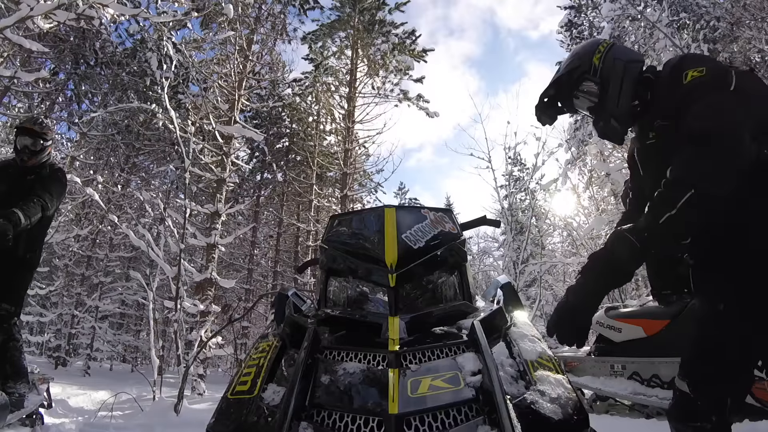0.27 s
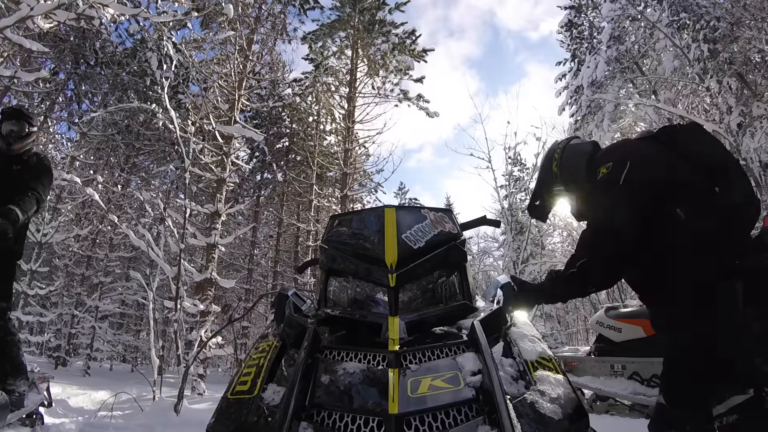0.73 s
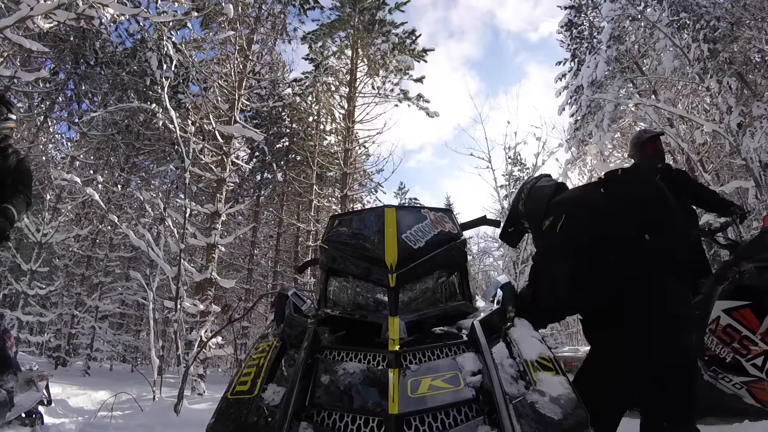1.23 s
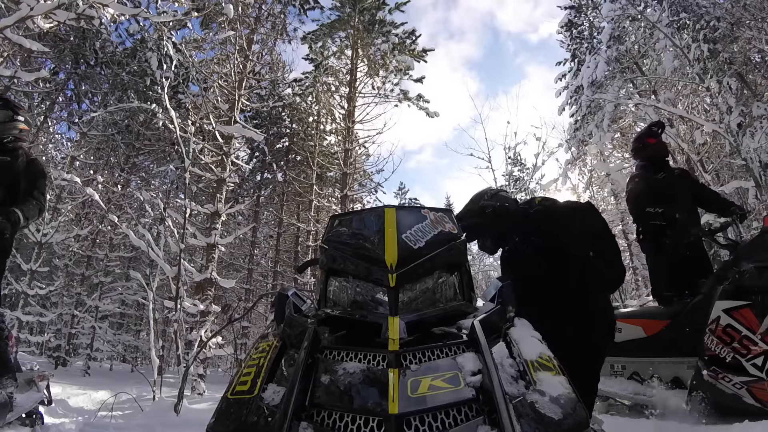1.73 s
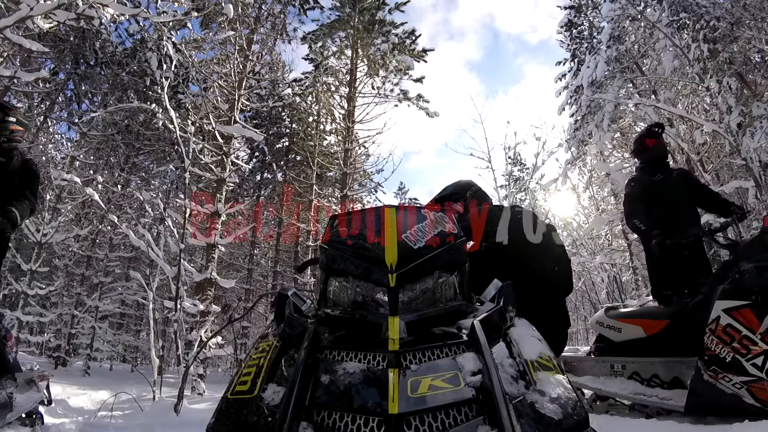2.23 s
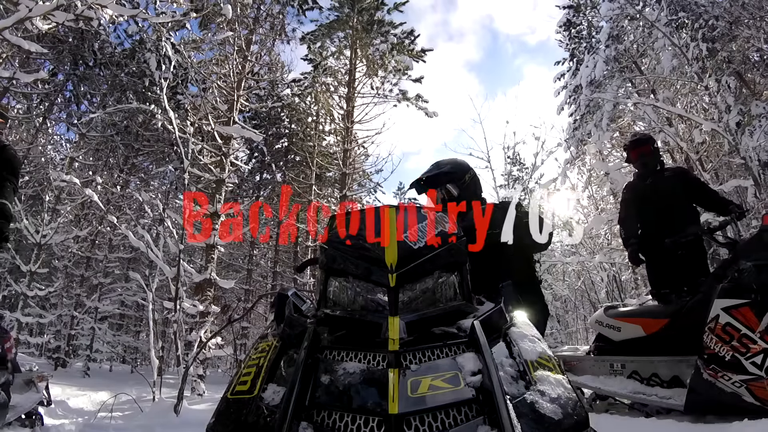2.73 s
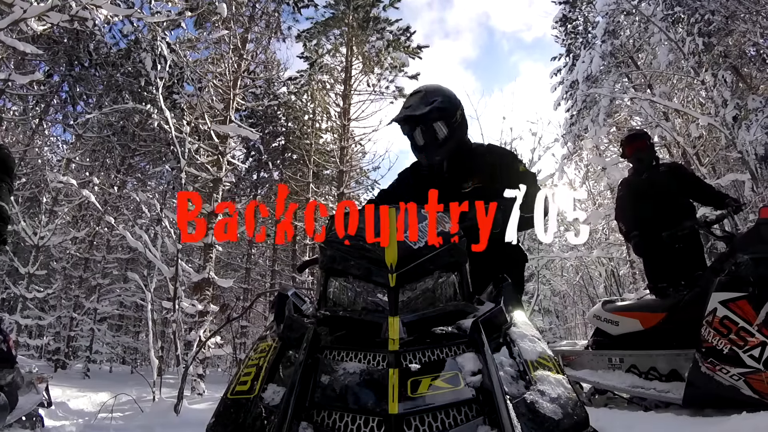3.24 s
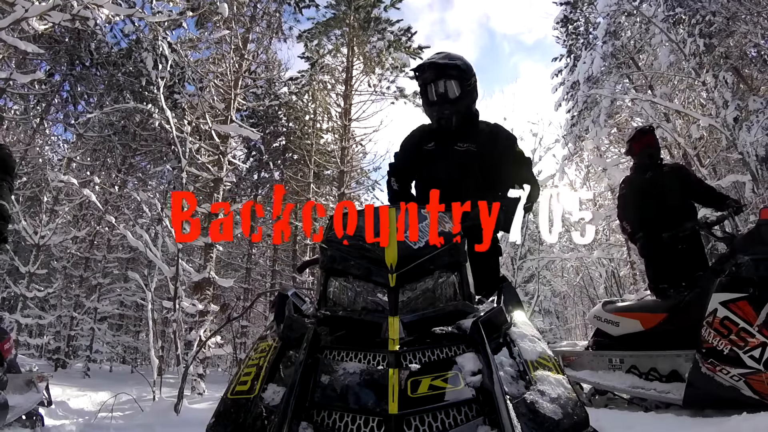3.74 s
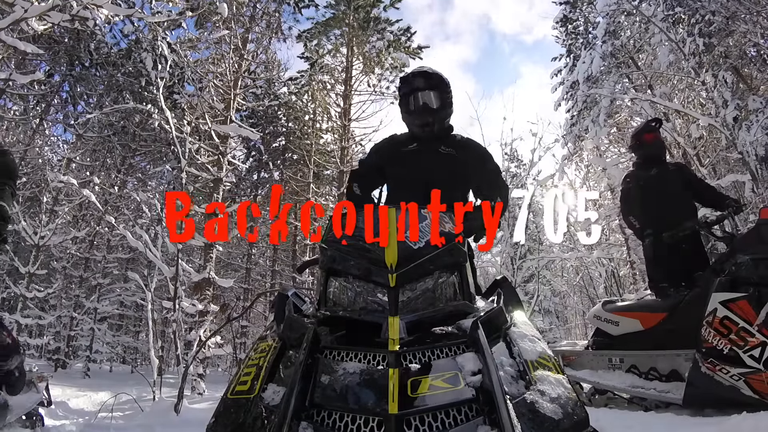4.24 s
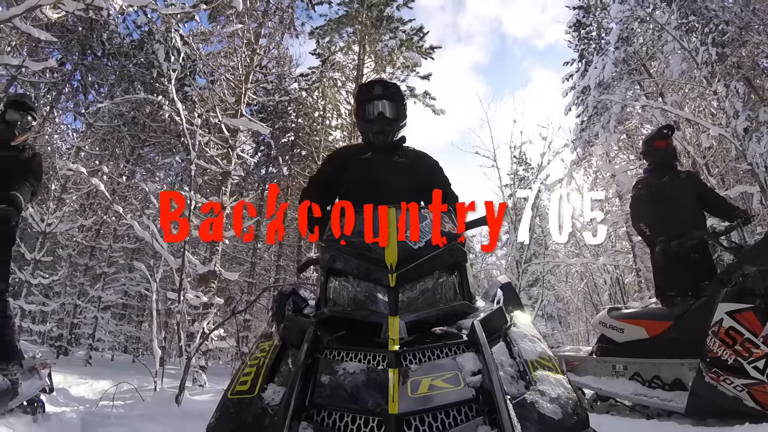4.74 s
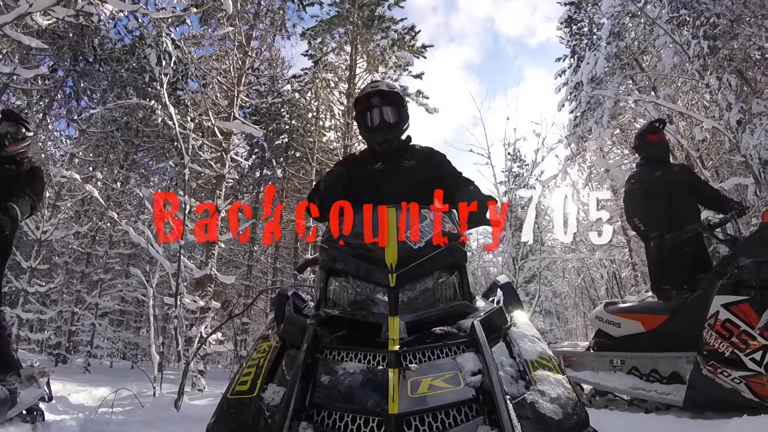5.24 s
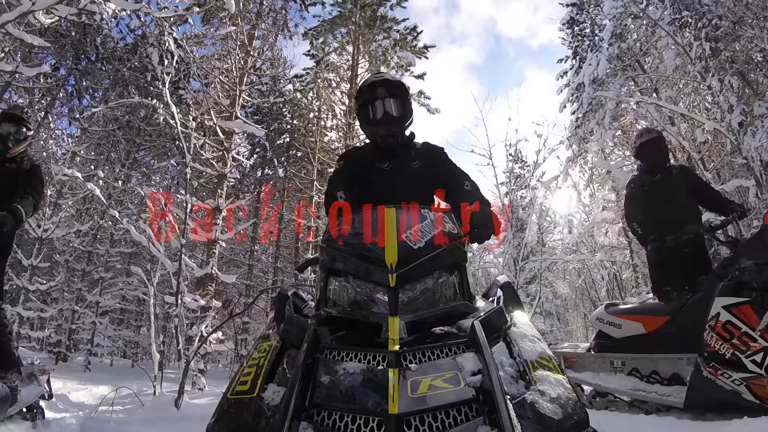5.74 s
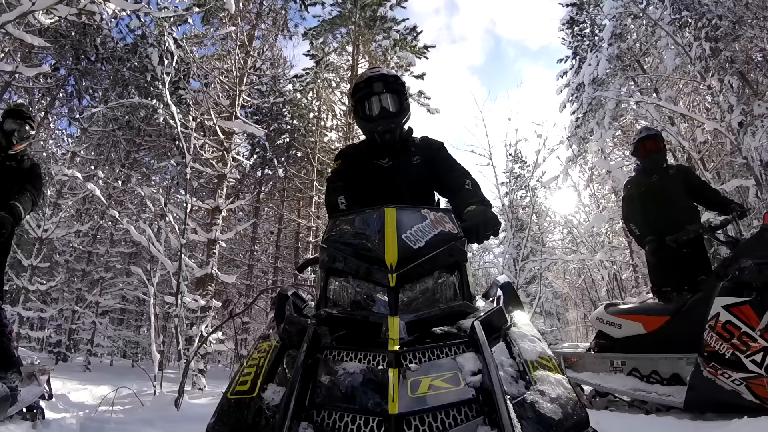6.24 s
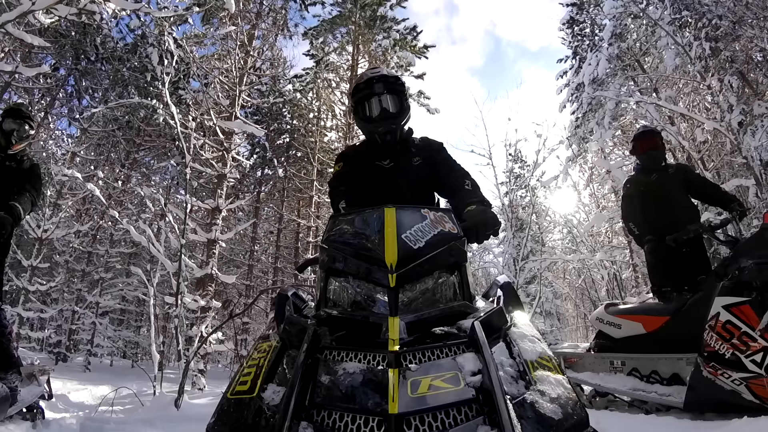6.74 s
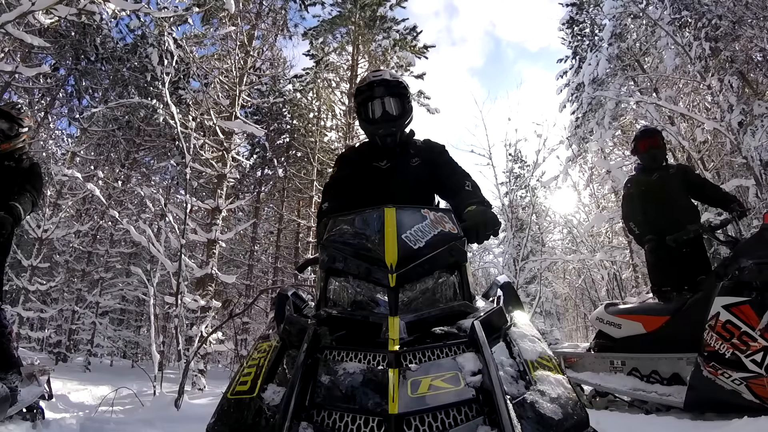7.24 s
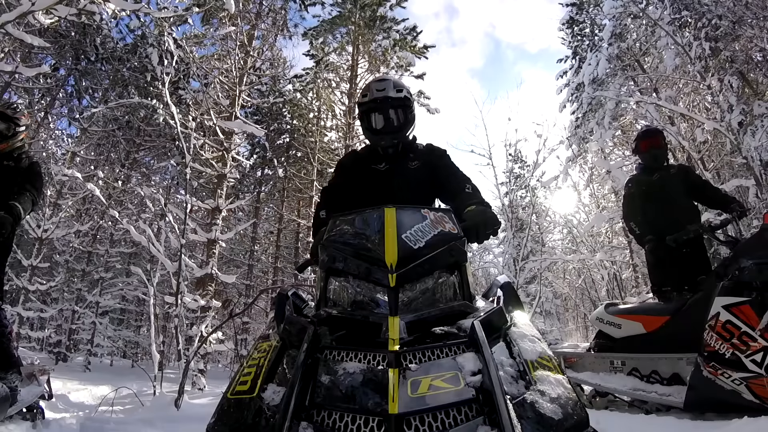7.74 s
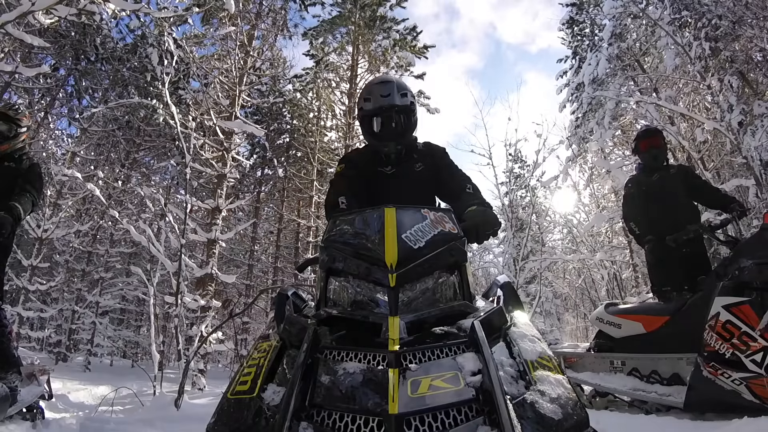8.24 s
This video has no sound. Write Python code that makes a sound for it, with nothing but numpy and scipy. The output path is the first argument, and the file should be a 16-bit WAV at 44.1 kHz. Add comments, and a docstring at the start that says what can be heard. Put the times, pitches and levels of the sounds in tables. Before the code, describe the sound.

Close, dry outdoor sound of several two-stroke snowmobiles idling in snowy woods. The nearest putts in stumbling, changing rhythms over a low hum, with clatter and bright clutch jingle. A distant engine buzzes and runs down early. Late on, a sharp clack, then another sled catches, revs up briefly and sinks to idle.

```python
"""Snowmobiles idle up close and dry, without echo: the nearest putts in changing rhythms over a 119 Hz hum,
its clutch jingling. Another starts after a sharp clack, flares up and sinks to idle; a distant one runs down.
Impulses timed by stroke counts excite muffler filters; shaped noise makes clatter, gas rush, jingle and wind.
Harmonic stacks sing the revving notes; impulses into decaying modes make the clacks and thuds."""
import sys
import numpy as np
from scipy import signal
from scipy.fft import rfft, irfft
from scipy.io import wavfile
from scipy.ndimage import uniform_filter1d, map_coordinates

SR = 44100
rng = np.random.default_rng(int(sys.argv[2]) if len(sys.argv) > 2 else 0)


def wrap_up_sound(samples):
    """Save the sound to the file named by the first command line argument, as 16-bit audio."""
    columns = np.atleast_2d(samples).T
    # keep every value between -1 and 1, then stretch to whole-number steps
    tamed = np.clip(columns, -1, 1)
    steps = np.round(tamed * 32767).astype(np.int16)
    wavfile.write(sys.argv[1], SR, steps)


N = 374409
TIME = np.arange(N) / SR  # seconds

# Rhythms of the near engine. Each entry: name, strokes from one putt to the next, repeated.
GAITS = {"lope": (3, 5), "trot": (3,), "double": (1, 7), "stutter": (1, 2, 1, 4), "lone": (8,)}
# Spells of the near engine, stumbling from rhythm to rhythm. Each row: start in seconds, rhythm name.
SPELLS = [(.003, "lone"), (0.102, "lone"), (.185, "trot"), (0.239, "lone"), (0.339, "lone"),
          (.426, "double"), (0.529, "double"), (0.629, "lone"), (.729, "lope"), (.948, "trot"),
          (1.131, "lope"), (1.479, "lope"), (1.614, "trot"), (1.803, "double"), (1.903, "trot"),
          (2.189, "lope"), (2.405, "lope"), (2.759, "lope"), (3.244, "double"), (3.362, "double"),
          (3.836, "trot"), (4.070, "lope"), (4.338, "trot"), (4.569, "trot"), (4.755, "double"),
          (4.86, "trot"), (5.247, "double"), (5.363, "double"), (5.580, "lope"), (5.717, "trot"),
          (5.921, "double"), (6.026, "double"), (6.127, "lone"), (6.178, "lone"), (6.211, "stutter"),
          (6.512, "lone"), (6.551, "lone"), (6.651, "lone"), (6.752, "lone"), (6.849, "lone"),
          (7.378, "lone"), (7.463, "lope"), (7.72, "lone"), (7.770, "lone"), (7.904, "lone"),
          (8.006, "double"), (8.109, "stutter"), (8.159, "lone"), (8.244, "double"), (8.444, "lone")]
# Strength of the near engine, for putts and hum alike. Each row: time in seconds, relative level in dB.
STRENGTH = [(0, -8.5), (.235, -6), (.285, 7), (.33, -7.5), (.55, -7.5), (1.08, -3.5), (1.13, -2.5), (3, 0),
            (5.8, -0.5), (6.25, -2.5), (6.66, -5.5), (6.75, -0.5), (7, -0.5), (7.12, -4), (7.25, -3),
            (7.4, -1.5), (7.7, -10), (7.78, -1.5), (8.1, -2.5), (8.25, -0.5), (8.49, -3)]
# Tone of one putt through the muffler. Each row: frequency in Hz, relative level in dB.
MUFFLER = [(20, -33), (40, -7.5), (60, -9.5), (100, 3), (125, -1.5), (170, -12.5), (250, -16), (305, -13.5),
           (350, -21.5), (420, -43), (800, -66.5), (2500, -117.5), (8000, -110)]
# Hum of the unfired strokes. Each row: multiple of the stroke rate, relative level in dB.
HUM = [(1, -10.5), (2, 0.5), (3, -24), (4, -17), (5, -18.5)]
# Idling machinery, before make-up gain. Each row: time in seconds, clatter level in dB, jingle level in dB.
IDLE = [(0, -56, -73), (.175, -53, -64.5), (.2, -46.5, -48.5), (1.2, -45, -49.5), (1.45, -48.5, -52.5),
        (3.2, -46, -50), (6.4, -46.5, -51.5), (7.6, -43.5, -48), (8.49, -45.5, -49.5)]
# Mid-range rasp, at the opening and after the flare. Each row: time in seconds, level in dB.
RASP_LEVEL = [(.16, -72), (.22, -53), (.45, -51), (1.25, -62), (1.45, -76), (7.3, -72), (7.5, -46.5),
              (7.8, -46.5), (8.2, -61)]
# Colour of that rasp. Each row: frequency in Hz, relative level in dB.
RASP = [(300, -24.5), (900, -8), (1150, 2), (1430, -1.5), (1750, 0), (2080, -8), (2450, -4.5), (2900, -19),
        (6000, -49)]
# Engine clatter through the hood. Each row: frequency in Hz, relative level in dB.
CLATTER = [(150, 9), (330, 3.5), (450, 2), (700, -3), (1200, -4), (1650, -11), (2000, -11), (2500, -14),
           (3200, -16), (4200, -28.5), (7000, -41), (11000, -52)]
# Jingling steel of the clutch. Each row: frequency in Hz, relative level in dB.
CLUTCH = [(2500, -12.5), (4400, -16), (4900, -9.5), (5350, 0.5), (5700, 2), (6100, -5), (6500, -1.5),
          (6950, -11), (7800, -15.5), (9000, -16.5), (10150, -22.5), (10700, -43.5)]
# Ringing partials of the clutch. Each row: frequency in Hz, relative level in dB.
STEEL = [(4643, -20.5), (5701, -5.5), (6405, 2.5), (6589, -2.5), (6950, -4.5), (7230, -5.5), (7624, -8),
         (7768, -6), (8580, -7.5), (9100, -10.5)]
# Exhausts of the other idling sleds. Each row: frequency in Hz, relative level in dB.
OTHERS = [(12, -24), (25, -10), (50, -4.5), (80, 15.5), (105, -6), (150, 1), (220, -5), (300, -14),
          (420, -14.5), (900, -40), (5000, -89.5)]
# Hum of a second idling sled. Each row: time in seconds, level in dB.
SECOND_HUM = [(0, -41), (.4, -33), (.65, -25), (1.05, -48), (2.2, -34.5), (2.6, -25), (4.2, -38.5),
              (6.3, -27), (7.7, -47), (7.9, -32), (8.49, -29)]
# Deep wind buffet. Each row: frequency in Hz, relative level in dB.
WIND = [(10, -19.5), (22, -15.5), (30, 0.5), (42, 5.5), (70, -25.5), (300, -77.5)]
# Run-downs of the distant sled. Each row: start in seconds, length in seconds, first firing rate in Hz,
# last firing rate in Hz, level at its loudest in dB.
RUN_DOWNS = [(0.15, 0.199, 77.5, 75.6, -36.5), (0.719, 0.71, 75.04, 52.2, -41.5),
             (7.798, .72, 100.9, 69.96, -38.5)]
# Mellow exhaust of the distant sled. Each row: frequency in Hz, relative level in dB.
DISTANT_PIPE = [(100, -17), (250, 0.5), (330, 0.5), (450, 1), (540, -7), (610, -2), (720, -10), (1000, -15),
                (2200, -18)]
# Dull thuds of the chassis. Each row: time in seconds, blow strength in dB.
THUDS = [(.161, -40.5), (.24, -43), (8.459, -27.5)]
# Modes that ring after a thud. Each row: frequency in Hz, decay in seconds, relative level in dB.
THUD_RING = [(392, 0.013, -9.5), (527, 0.01, 2.5), (575, 0.01, -8), (1360, .005, -12), (2090, 0.005, -16)]
# Sharpest clinks of the clutch. Each row: time in seconds, blow strength in dB.
CLINKS = [(.775, -21.5), (1.569, -26.5), (2.005, -30), (2.056, -25), (2.235, -24.5), (2.526, -28),
          (2.617, -24), (2.758, -32), (2.838, -23.5), (2.861, -27), (3.031, -30), (3.363, -25),
          (3.488, -22.5), (4.012, -22), (4.491, -26), (4.642, -23), (4.867, -23), (4.952, -22),
          (5.038, -22), (5.087, -23), (5.264, -30), (5.357, -27), (5.409, -21), (5.777, -22.5),
          (6.132, -23), (6.285, -20), (6.605, -16.5), (6.675, -13), (6.696, -14), (6.742, -14.5),
          (6.767, -15)]
# Clacks of the drive under the hood. Each row: time in seconds, blow strength in dB, share of steel in dB.
CLACKS = [(6.489, -23, 2), (6.4955, -24, 5), (6.4985, -14.5, -14), (6.5014, -23, -18), (6.5058, -28, -4),
          (6.5125, -22, -13), (6.5195, -38, -22), (6.55, -34, 4)]
# Modes that ring on after a clack. Each row: frequency in Hz, decay in seconds, relative level in dB.
CLACK_RING = [(206, 0.089, -16), (410, 0.0091, -14), (630, 0.0086, -8), (698, 0.01, -7), (865, .012, -23),
              (958, 0.01, -18), (2050, 0.014, -28)]
# Hood resonances, before damping. Each row: frequency in Hz, width in Hz, relative weight in dB.
HOOD = [(688, 34, 6.5), (770, 130, -11), (1430, 56, -5.5), (2123, 73, -10.5), (2270, 64, -14),
        (2415, 34, -10.5)]
# Speed of the starting engine: up to a peak, then back to idle. Each row: time in seconds, firing rate in Hz.
FLARE_SPEED = [(6.54, 59.26), (6.65, 91.99), (6.72, 100.4), (6.85, 138), (6.95, 151.2), (7.03, 154.9),
               (7.11, 139.2), (7.26, 104.5), (7.42, 71.65), (7.52, 61), (7.65, 59.3)]
# Its exhaust, which booms again as the speed nears idle. Each row: time in seconds, level in dB.
FLARE_EXHAUST = [(6.53, -27), (6.62, -40), (6.77, -32), (6.95, -27.5), (7.1, -28.5), (7.32, -35),
                 (7.4, -23), (7.55, -22), (7.7, -31.5), (8.49, -44)]
# Tone of its exhaust pipe. Each row: frequency in Hz, relative level in dB.
FLARE_PIPE = [(40, -4.5), (80, 3.5), (115, 7.5), (140, 9.5), (185, -4), (300, -11.5), (450, -17.5),
              (700, -21), (2000, -68), (8000, -88)]
# Clean note of its exhaust and hood. Each row: frequency in Hz, relative level in dB.
FLARE_NOTE = [(100, -20), (200, 12), (260, 5.5), (330, 5.5), (470, -3.5), (600, 0), (720, -3), (800, -1.5),
              (930, -9), (1200, -18), (1450, -12.5), (1800, -21), (2200, -15), (2450, -19), (2800, -42)]
# Its gas rush through the hood panels. Each row: frequency in Hz, relative level in dB.
FLARE_PANELS = [(150, -22.5), (400, 4.5), (600, -9), (780, 4.5), (950, 1.5), (1200, -7.5), (1800, -16),
                (2250, -23), (2800, -17), (4300, -21), (8000, -23), (11000, -46)]
# Its clutch. Each row: frequency in Hz, relative level in dB.
FLARE_CLUTCH = [(3000, -34), (4600, -21), (5300, -3.5), (5750, -0.5), (6100, -11.5), (6500, 0), (7100, -14),
                (8500, -16.5), (9700, -19), (10600, -38.5)]
# Squeaks as it catches, before the broken grip. Each row: time in seconds, pitch in Hz, level in dB.
SQUEAKS = [(6.552, 4960, -48), (6.611, 4600, -43), (6.633, 4680, -46), (6.651, 4780, -44),
           (6.684, 4600, -44)]

STROKE_HZ = 59.3  # near engine, nominal: each spell is stretched to whole strokes
# least strokes from a later putt of a spell to the next spell's start; the first putt always sounds
CLEARING_STROKES = 3
PUTT_DB, PUTT_SCATTER_DB, HUM_DB = -11.5, 0.74, -25.5
SWELL_SHARE = 0.7  # part of a run-down spent getting louder
CLINKS_PER_S, SOFT_CLINK_DB = 3, -27  # soft clinks also follow the near engine's strength
CATCH_S, IDLE_HZ = 6.54, 59.2  # starting engine
ATTACK_S, HOLD_S, RELEASE_S = 0.059, 0.96, 0.14  # its effort
# loudness of its hood and clutch: base dB at idle, dB added by effort, dB per octave of speed
HOOD_LAW, CLUTCH_LAW = (-46, 15.65, 3), (-56.5, 13.2, 3.4)
SURGE_DB = 7.5  # wander of its firing strength at full evenness
DULL_HZ, OPENS_S, TOP_HZ = 7050, 1.35, 11000  # opening treble limit, time to open up, final limit


def amp(db):
    """Decibels to gain."""
    return 10 ** (np.asarray(db) / 20)


def unit(x):
    """Scale to rms 1."""
    return x / np.sqrt(np.mean(x ** 2))


def curves(table):
    """Each column of a table, joined by straight lines in time."""
    s, *columns = np.transpose(table)
    return [np.interp(TIME, s, c) for c in columns]


def noise():
    """White noise."""
    return rng.standard_normal(N)


def walk(rate):
    """Smooth random drift with a spread near 1, through rate knots a second."""
    knots = rng.standard_normal(4096)
    return map_coordinates(knots, [TIME * rate], order=2, mode="wrap")


def response(points, size=8192):
    """Causal (minimum-phase) impulse response with the given (Hz, dB) spectrum, peak 1."""
    hz, db = np.transpose(points)
    f = np.maximum(np.fft.rfftfreq(size, 1 / SR), 1)
    cepstrum = irfft(np.log(amp(np.interp(np.log(f), np.log(hz), db))))
    # fold the cepstrum so that the energy comes first
    cepstrum[1:size // 2] *= 2
    cepstrum[size // 2 + 1:] = 0
    h = irfft(np.exp(rfft(cepstrum)))
    return h / np.abs(h).max()


def ring(x, h):
    """Pass x through an impulse response."""
    return signal.oaconvolve(x, h)[:N]


def strikes(times, sizes):
    """Impulses at the given times, each shared between two samples."""
    at = np.clip(np.asarray(times) * SR, 0, N - 2)
    i = at.astype(int)
    late = at - i
    return np.bincount(i, sizes * (1 - late), N) + np.bincount(i + 1, sizes * late, N)


def fade(x, decay_s):
    """Give each impulse an exponential tail."""
    return signal.lfilter([1], [1, -np.exp(-1 / (decay_s * SR))], x + 1e-18)


def strokes(turns, scatter_db, jitter_s):
    """One impulse each time the stroke count passes a whole number, uneven in size and timing."""
    times = TIME[1:][np.diff(np.floor(turns)) > 0]
    chance = rng.uniform(-np.sqrt(3), np.sqrt(3), (len(times), 2))
    return strikes(times + jitter_s * chance[:, 0], amp(scatter_db * chance[:, 1]))


def steady(x, size=8000):
    """Hold the short-term rms at 1, whatever the firing rate."""
    return x / np.sqrt(np.abs(uniform_filter1d(x ** 2, size)) + 1e-12)


def modes(table, size=8192):
    """Impulse response of decaying sine modes."""
    t = TIME[:size]
    return sum(amp(db) * np.exp(-t / decay_s) * np.sin(2 * np.pi * hz * t) for hz, decay_s, db in table)


def buzz(hz, spectrum, waver_db, count):
    """Harmonics of a gliding pitch under a fixed spectrum, each with its own phase and waver."""
    at_hz, at_db = np.transpose(spectrum)
    phase, out = 2 * np.pi * np.cumsum(hz) / SR, 0
    knots = np.arange(0, TIME[-1] + .04, .04)
    knot_hz = np.interp(knots, TIME, hz)
    for k in range(1, count + 1):
        waver = waver_db * rng.standard_normal(len(knots))
        gain = amp(np.interp(k * knot_hz, at_hz, at_db) + waver)
        out = out + np.interp(TIME, knots, gain) * np.sin(k * phase + rng.uniform(0, 2 * np.pi))
    return out


def crank():
    """Stroke count of the near engine, and the count at which each spell begins: always a whole stroke."""
    times = np.array([s for s, gait in SPELLS])
    count = np.cumsum(np.round(np.diff(times, prepend=times[0]) * STROKE_HZ))
    return np.interp(TIME, times, count - times * STROKE_HZ) + TIME * STROKE_HZ, count


def putts(turns, starts):
    """Firings follow each spell's rhythm; later putts too close to the next spell's start are left out."""
    fired = []
    ends = np.append(starts[1:], turns[-1] + CLEARING_STROKES)
    for (s, gait), first, end in zip(SPELLS, starts, ends):
        gaps = np.resize(GAITS[gait], int(end - first))
        stroke = first + np.append(0, np.cumsum(gaps))
        fired.extend(stroke[stroke <= max(end - CLEARING_STROKES, first)])
    sizes = amp(PUTT_DB + PUTT_SCATTER_DB * rng.standard_normal(len(fired)))
    return strikes(np.interp(fired, turns, TIME), sizes) * amp(curves(STRENGTH)[0])


def near_exhaust(turns, firings, lag_turns=0.25, hum_waver_db=2.0, upset=0.49, wander_turns=0.043):
    """Each firing thumps the muffler; between firings the pistons pump a soft hum through it."""
    pumping = turns - lag_turns + wander_turns * walk(14)
    hum = sum(-amp(db + hum_waver_db * walk(22)) * np.cos(2 * np.pi * k * pumping) for k, db in HUM)
    # a firing upsets the standing wave in the pipe, which then builds up again
    disturbance = uniform_filter1d(fade(firings / firings.max(), decay_s=0.018), size=400)
    swell = np.exp(-upset * disturbance)
    thumps = ring(firings, response(MUFFLER))
    return thumps + amp(HUM_DB + curves(STRENGTH)[0]) * unit(hum * swell)


def steel(decay_s=0.013, size=4096):
    """Impulse response of the clutch's ringing partials, all decaying together."""
    t = TIME[:size]
    return sum(amp(db) * np.sin(2 * np.pi * hz * t) for hz, db in STEEL) * np.exp(-t / decay_s)


def near_machinery(turns, firings, steel_db=-13):
    """Pistons slap once a stroke; each firing shakes the loose clutch parts, which jingle on."""
    clatter_db, jingle_db = curves(IDLE)
    shake = fade(firings / firings.max(), decay_s=0.016)
    slap = fade(strokes(turns - .45, scatter_db=1.5, jitter_s=0.00056), decay_s=0.00049)
    clatter = noise() * (1 + 0.48 * shake + 0.26 * unit(slap)) * amp(0.61 * walk(40))
    rattle = fade(strokes(2 * turns, scatter_db=6.5, jitter_s=0.0018), decay_s=0.011)
    jingle = (.5 + 0.51 * unit(rattle)) * (1 + 0.85 * shake)
    clutch = unit(ring(noise() * jingle, response(CLUTCH)))
    clutch = clutch + amp(steel_db) * unit(ring(noise() * jingle, steel()))
    rasp = amp(curves(RASP_LEVEL)[0]) * unit(ring(clatter, response(RASP)))
    hooded = amp(clatter_db + 8.0) * unit(ring(clatter, response(CLATTER)))
    return rasp + hooded + amp(jingle_db + 2.5) * unit(clutch)


def other_sleds(level_db=-33.5):
    """Two more engines thump at their own drifting stroke rates; one adds a hum at twice its rate."""
    turns = [np.cumsum(hz * (1 + .03 * walk(7))) / SR for hz in (47, 55)]
    pulses = sum(strokes(t, scatter_db=3.5, jitter_s=0.00194) for t in turns)
    thumps = unit(ring(pulses - pulses.mean(), response(OTHERS)))
    hum = np.sin(2 * np.pi * 2 * turns[1])
    return amp(level_db) * thumps + amp(curves(SECOND_HUM)[0]) * unit(hum)


def wind_buffet(level_db=-40):
    """Deep wind buffet: low-passed noise with a drifting level."""
    buffet = ring(noise(), response(WIND))
    return amp(level_db + 1.9 * walk(3.3)) * unit(buffet)


def distant_sled(rush_db=-4):
    """A rough, mellow buzz in a rush of gas, swelling and fading while its pitch sinks."""
    glide = [point for s, length, first, last, db in RUN_DOWNS
             for point in ((s, first), (s + length, last))]
    swell = 0
    for s, length, first, last, db in RUN_DOWNS:
        arc = np.interp((TIME - s) / length, [0, SWELL_SHARE, 1], [0, np.pi / 2, np.pi])
        swell = swell + amp(db) * np.sin(arc)
    shaky_hz = curves(glide)[0] * (1 + .012 * walk(50))
    rush = unit(ring(noise(), response(DISTANT_PIPE + [(3000, -40), (8000, -67.5)])))
    note = steady(buzz(shaky_hz, DISTANT_PIPE, waver_db=4.0, count=28))
    return swell * steady(note + amp(rush_db) * rush)


def thuds(scuff_db=-10, steel_db=-12):
    """Dull blows ring the chassis modes, each with a short noise scuff and a shake of the clutch."""
    s, db = np.transpose(THUDS)
    blows = strikes(s, amp(db))
    scuff = amp(scuff_db) * unit(ring(noise(), response(RASP)))
    shake = amp(steel_db) * unit(ring(noise(), response(CLUTCH)))
    return ring(blows, modes(THUD_RING)) + (scuff + shake) * fade(blows, decay_s=0.013)


def clinks():
    """Loose clutch parts strike now and then; the soft random ones hit harder when the engine is strong."""
    s, db = np.transpose(CLINKS)
    when = rng.uniform(0, TIME[-1], size=int(CLINKS_PER_S * TIME[-1]))
    return strikes(s, amp(db)) + strikes(when, amp(SOFT_CLINK_DB)) * amp(curves(STRENGTH)[0])


def hood(damping, size=8192):
    """Impulse response of the hood's modes, peak 1; wider modes die sooner, damping scales every width."""
    t = TIME[:size]
    h = sum(amp(db) * width * np.exp(-np.pi * width * damping * t) * np.sin(2 * np.pi * hz * t)
            for hz, width, db in HOOD)
    return h / np.abs(h).max()


def knocks(crack_db=-22):
    """Clacks ring the hood and burst through the clutch as noise; clinks burst through the clutch alone."""
    s, db, steel_db = np.transpose(CLACKS)
    blows = strikes(s, amp(db))
    crunch = ring(noise() * fade(blows, decay_s=0.026), response(FLARE_PANELS))
    panels = .6 * ring(blows, hood(damping=1.6)) + .02 * crunch
    tail = ring(blows, modes(CLACK_RING))
    scrape = fade(strikes(s, amp(db + steel_db)), decay_s=0.0077) + 0.35 * fade(clinks(), decay_s=0.014)
    clutch = response(FLARE_CLUTCH)
    metal = 0.34 * ring(noise() * scrape, clutch / np.linalg.norm(clutch))
    crack = amp(crack_db) * noise() * fade(blows, decay_s=0.005)
    return panels + tail + metal + crack


def flare():
    """Firing rate and effort of the starting engine."""
    effort_s = np.cumsum([0, ATTACK_S, HOLD_S, RELEASE_S])
    return curves(FLARE_SPEED)[0], np.interp(TIME - CATCH_S, effort_s, [0, 1, 1, 0])


def starting_sled(note_db=-3.5, half_orders_db=-7.5, gas_db=-6.5, steel_db=-6):
    """The engine catches, flares and settles: its firings drive the pipe, the hood panels and the clutch."""
    hz, effort = flare()
    hood_level, clutch_level = (idle + push * effort + slope * np.log2(hz / IDLE_HZ)
                                for idle, push, slope in (HOOD_LAW, CLUTCH_LAW))
    # with speed the clean note sings out, and the firing strength surges more widely
    evenness = np.interp(hz, [60, 108], [.45, 1])
    shaky_hz = hz * (1 + .009 * walk(90))
    pulses = strokes(np.cumsum(shaky_hz) / SR, scatter_db=4.0, jitter_s=0.0002)
    pulses = pulses * amp(SURGE_DB * evenness * np.tanh(walk(90)))
    centred = pulses - uniform_filter1d(pulses, size=2000)
    pipe = steady(ring(centred, response(FLARE_PIPE)), size=3000)
    grain = amp(2.2 * walk(130))
    # its two cylinders fire unequally, which adds a growl between the harmonics
    growl = amp(half_orders_db) * buzz(shaky_hz / 2, FLARE_NOTE, waver_db=3, count=22)
    note = evenness * steady(grain * (buzz(shaky_hz, FLARE_NOTE, waver_db=4.5, count=20) + growl))
    puffs = 1.2 + 0.5 * steady(fade(pulses, decay_s=0.0061))
    gas = unit(ring(noise() * puffs, response(FLARE_PANELS)))
    gas = gas + 1.25 * unit(ring(noise() * puffs, hood(damping=0.82)))
    clutch = unit(ring(noise() * puffs, response(FLARE_CLUTCH)))
    clutch = clutch + amp(steel_db) * unit(ring(noise() * puffs, steel(decay_s=0.012)))
    running = np.clip((TIME - 6.52) / 0.016, 0, 1)  # silent until just before it catches
    return running * (amp(curves(FLARE_EXHAUST)[0]) * pipe
                      + amp(hood_level) * (amp(note_db) * note + amp(gas_db) * unit(gas))
                      + amp(clutch_level) * unit(clutch))


def squeak(length_s=0.011, rise_hz_per_s=3000):
    """Faint scraping squeaks: short rising tones with a wavering pitch, broken up by a fluttering grip."""
    waver, grip = 1 + .025 * walk(500), np.abs(walk(220))
    out = 0
    for s, hz, db in SQUEAKS:
        phase = 2 * np.pi * np.cumsum(hz * waver + rise_hz_per_s * (TIME - s)) / SR
        out = out + amp(db) * np.exp(-((TIME - s) / length_s) ** 2) * np.sin(phase)
    return grip * out


def scene():
    """All the sleds and the wind, heard from one spot."""
    turns, starts = crank()
    firings = putts(turns, starts)
    near = near_exhaust(turns, firings) + near_machinery(turns, firings)
    far = other_sleds() + distant_sled()
    return (near + far + wind_buffet() + thuds() + knocks() + starting_sled() + squeak())[None]


def record(dry):
    """The treble is dull at first and opens up; a steep low-pass then cuts the top."""
    dull = signal.sosfiltfilt(signal.butter(3, DULL_HZ, fs=SR, output="sos"), dry)
    opened = dull + np.clip(TIME / OPENS_S, 0, 1) ** 2 * (dry - dull)
    return signal.sosfilt(signal.ellip(8, .2, 70, TOP_HZ, fs=SR, output="sos"), opened)


dry = scene()
out = record(dry)
wrap_up_sound(out)
```